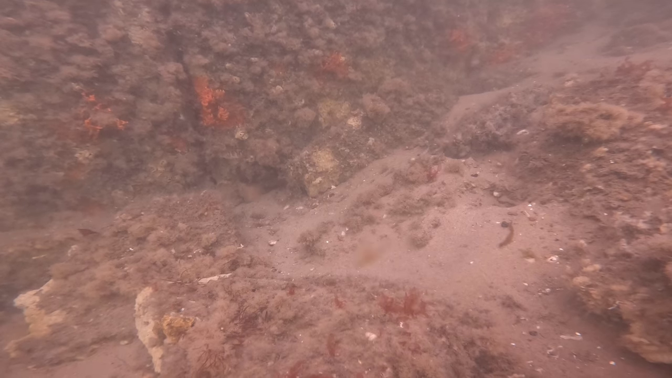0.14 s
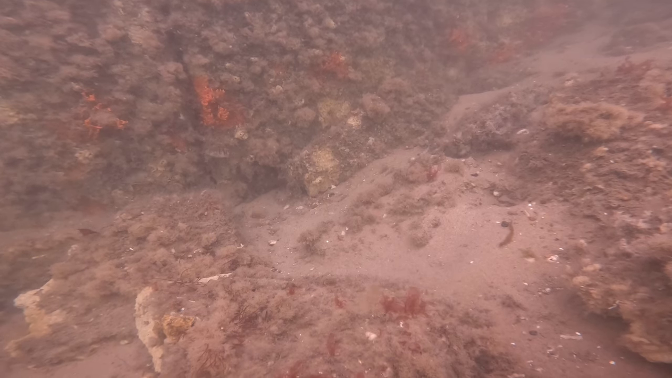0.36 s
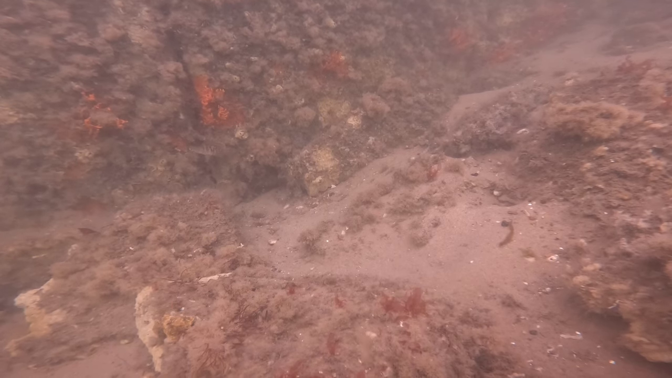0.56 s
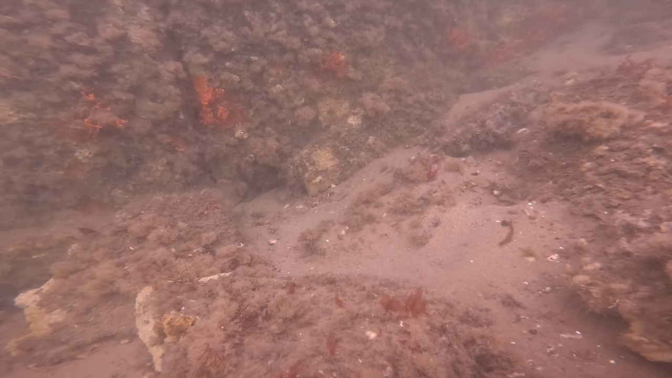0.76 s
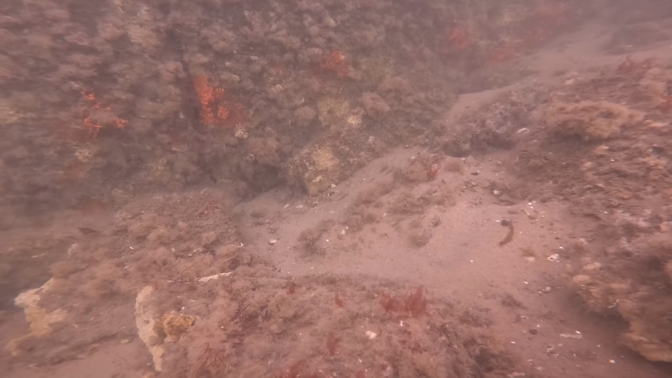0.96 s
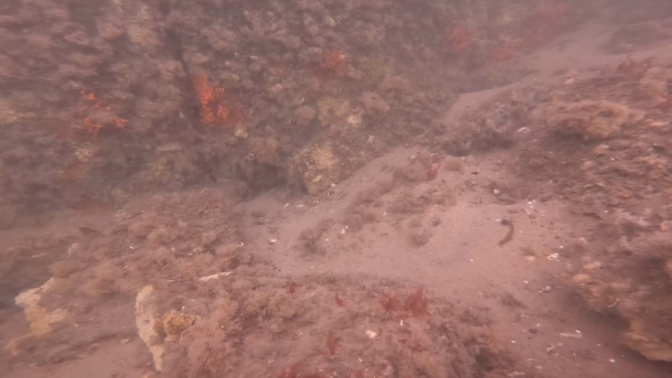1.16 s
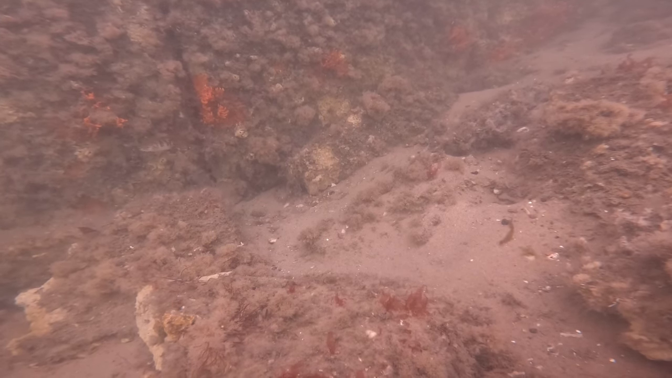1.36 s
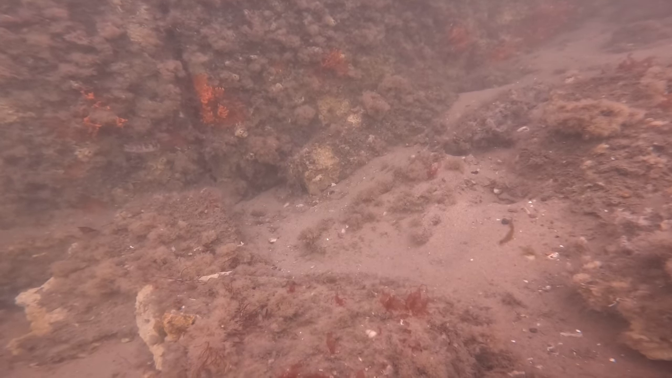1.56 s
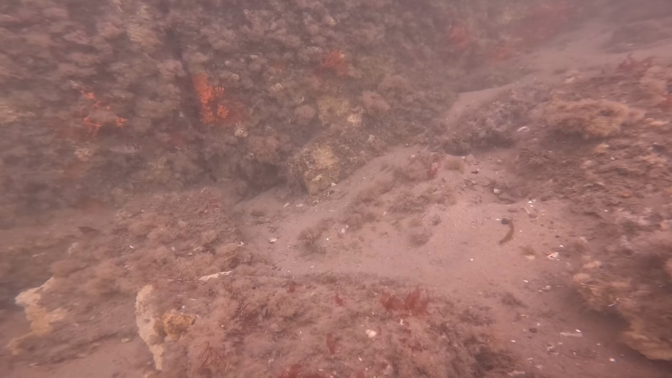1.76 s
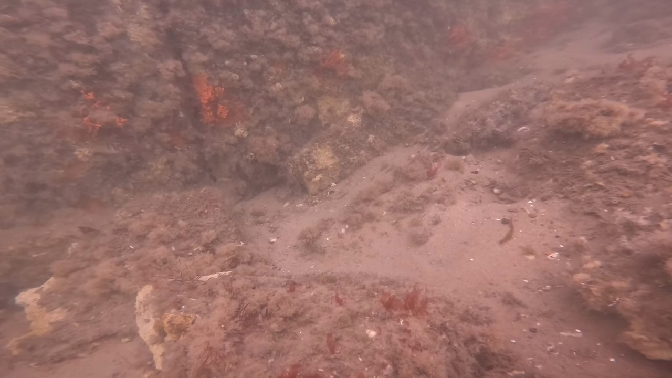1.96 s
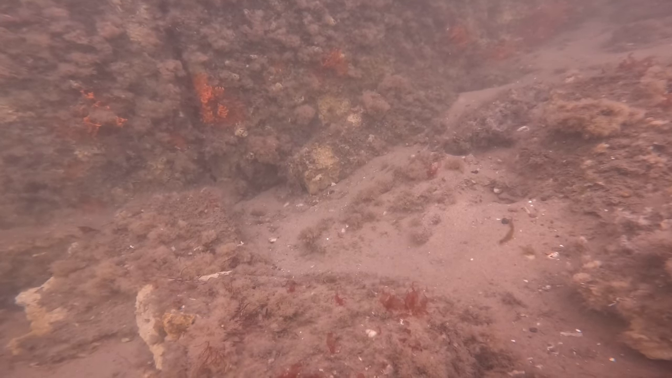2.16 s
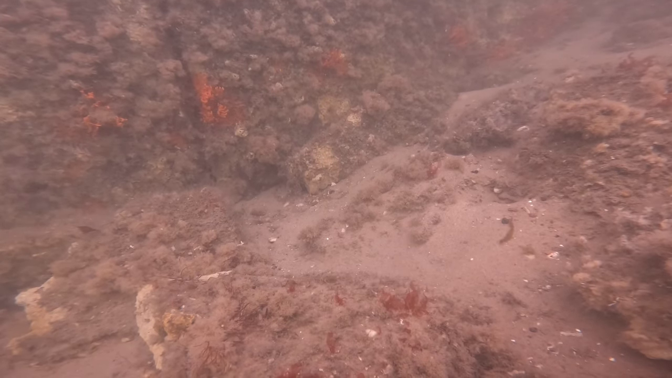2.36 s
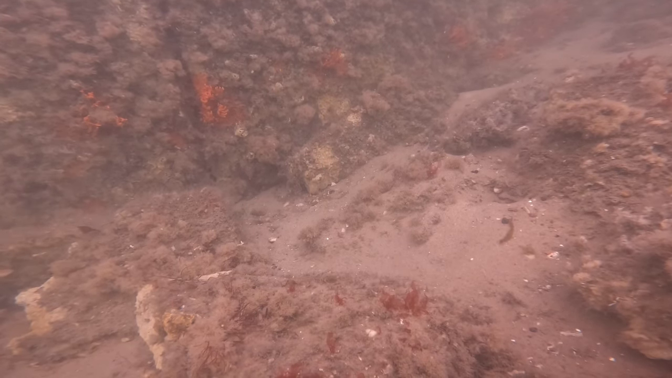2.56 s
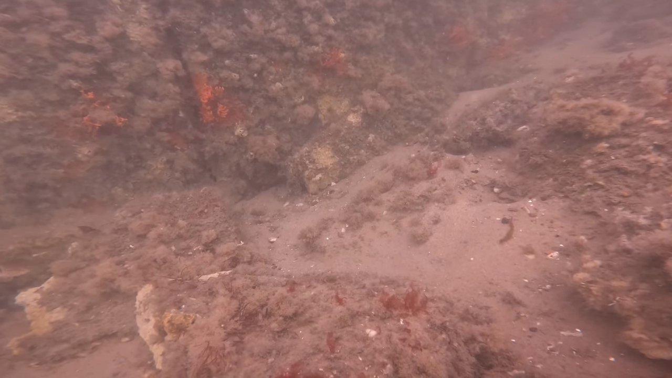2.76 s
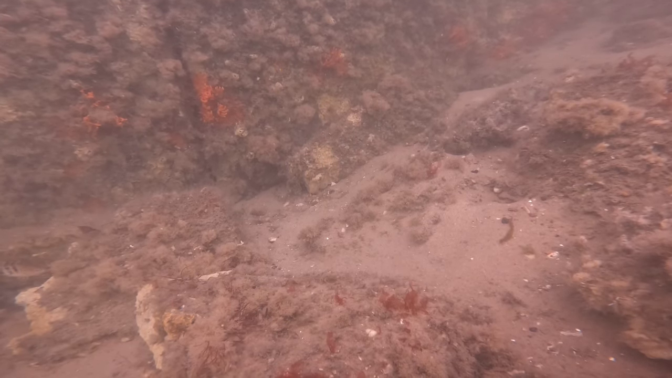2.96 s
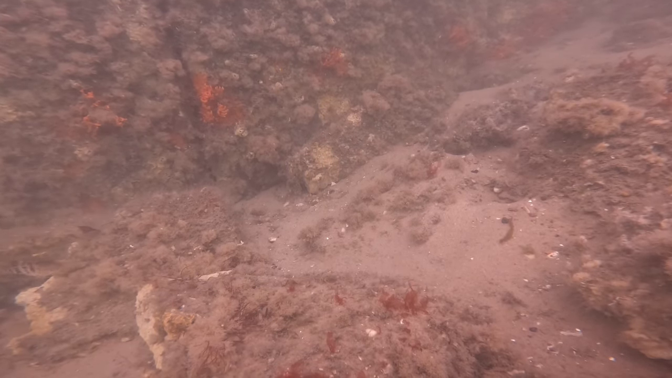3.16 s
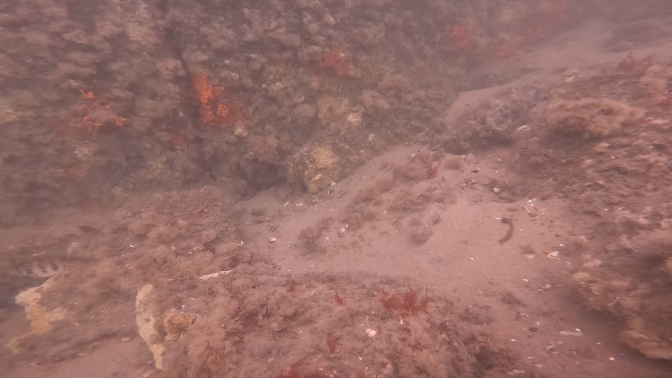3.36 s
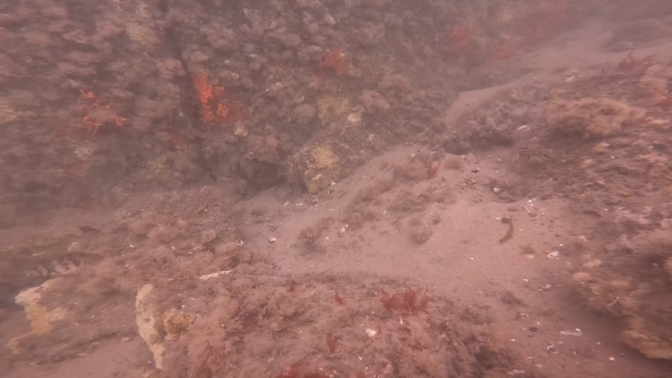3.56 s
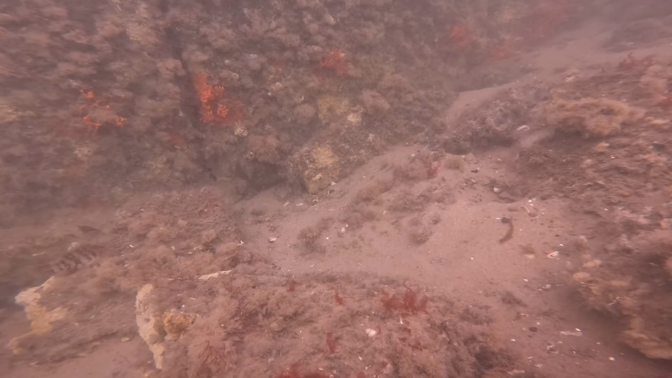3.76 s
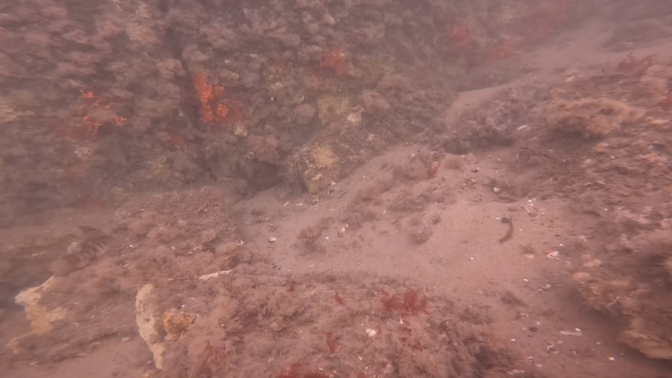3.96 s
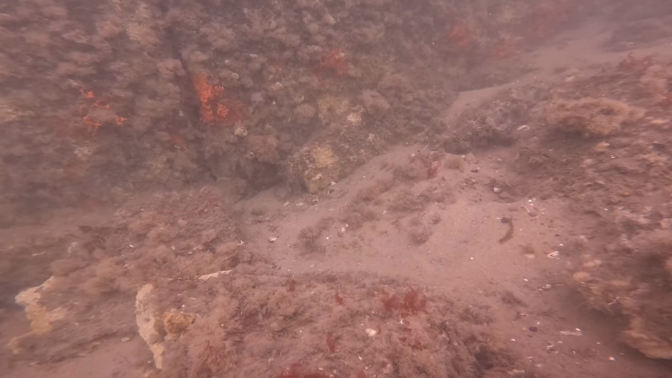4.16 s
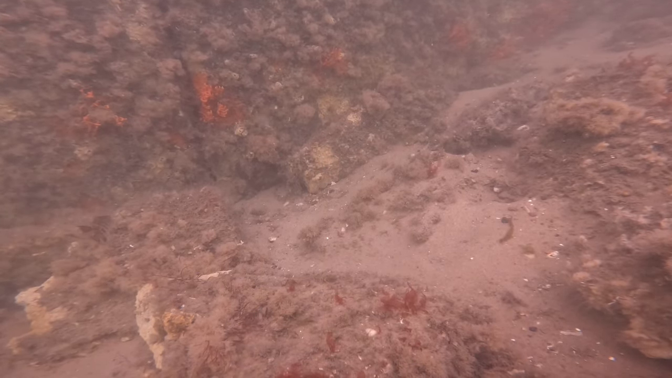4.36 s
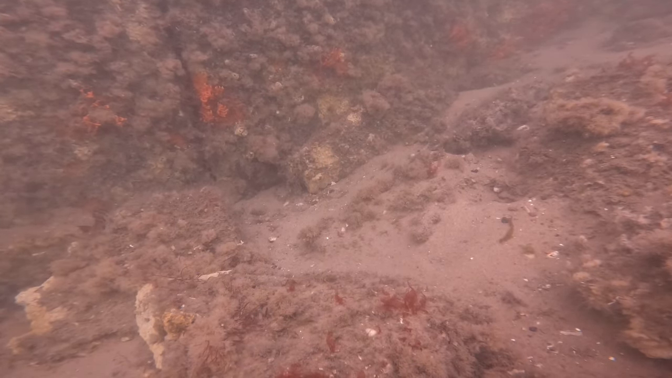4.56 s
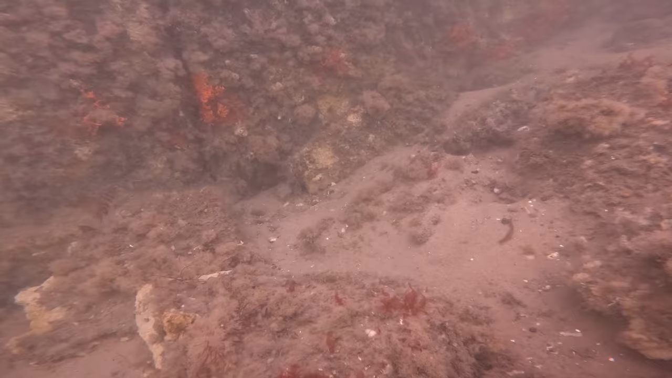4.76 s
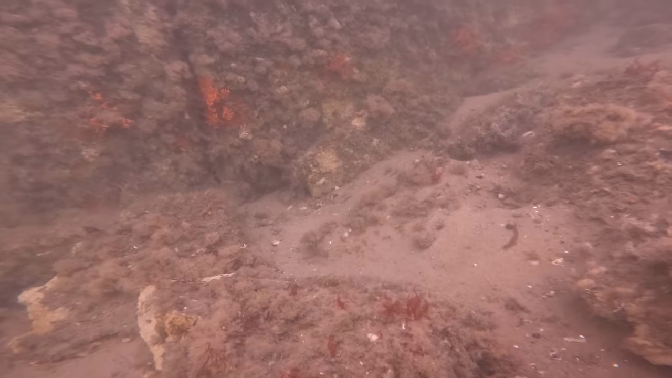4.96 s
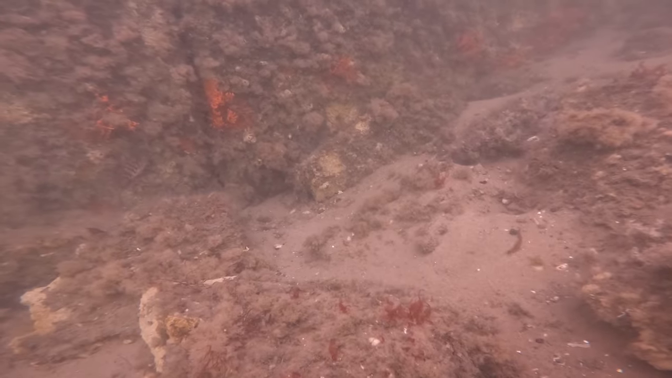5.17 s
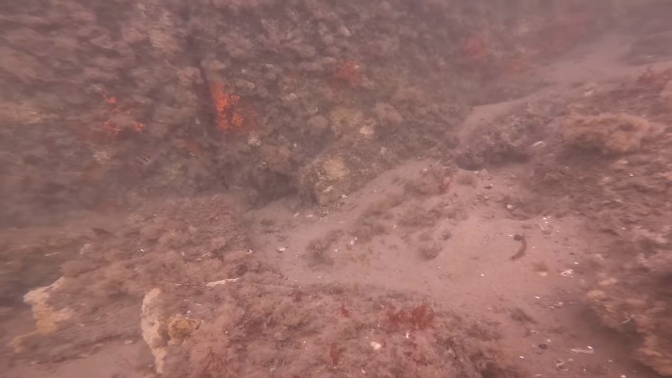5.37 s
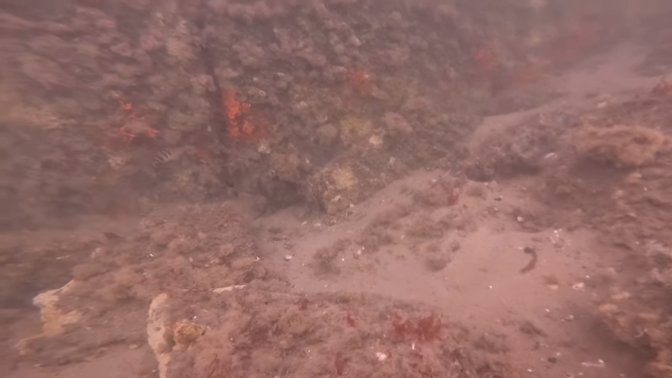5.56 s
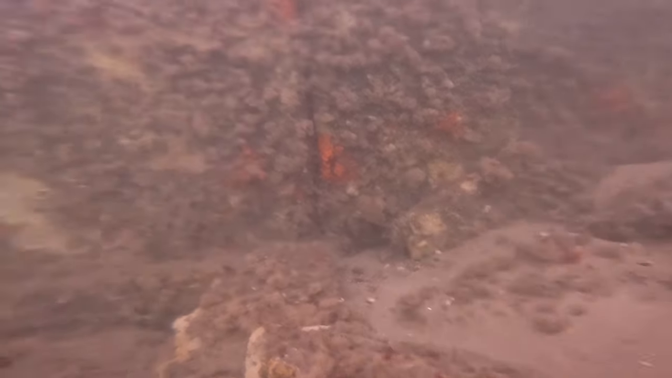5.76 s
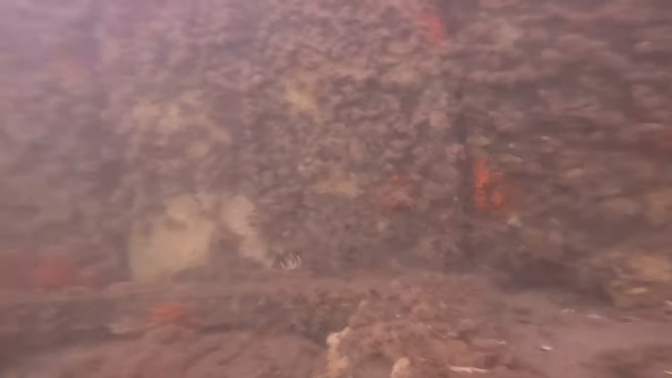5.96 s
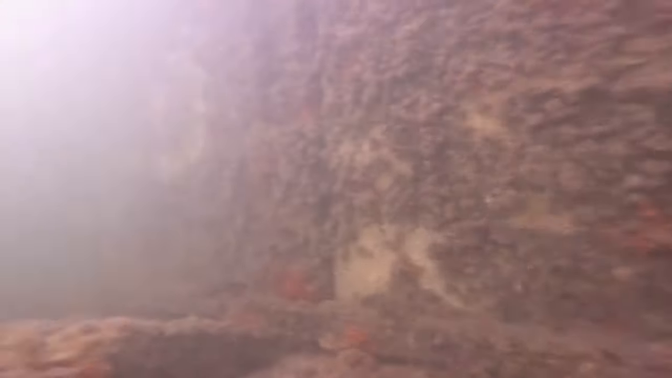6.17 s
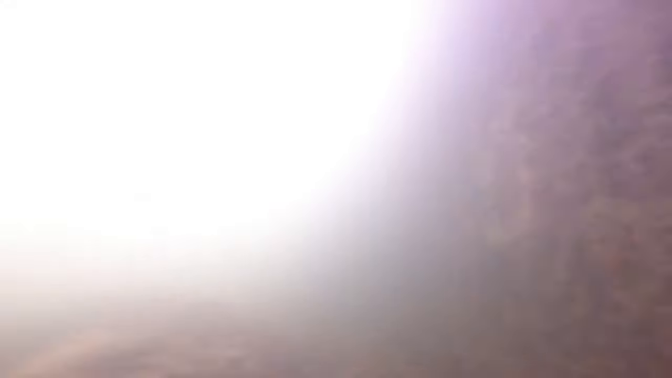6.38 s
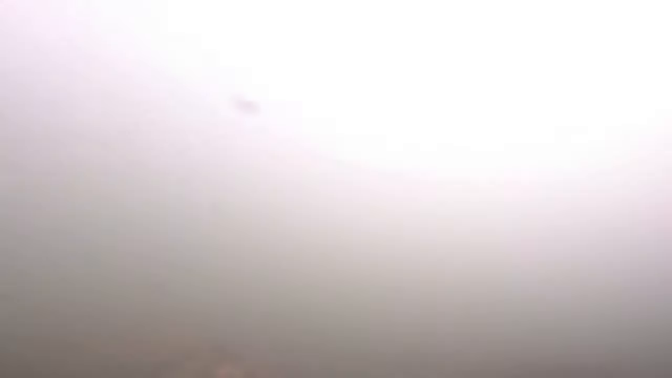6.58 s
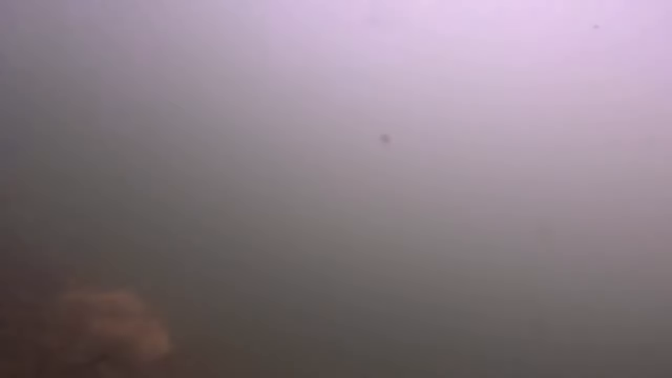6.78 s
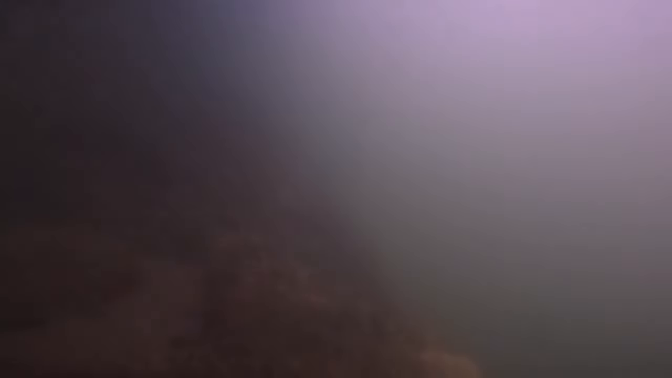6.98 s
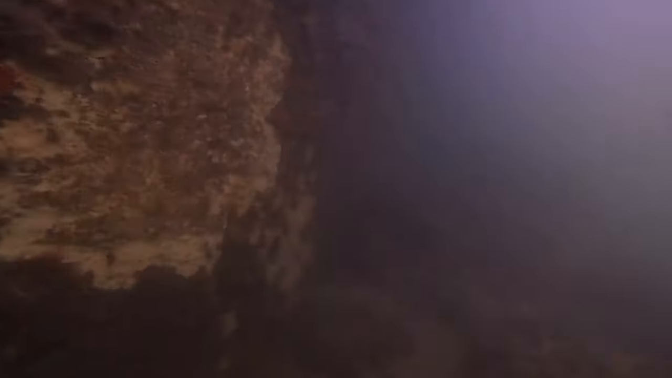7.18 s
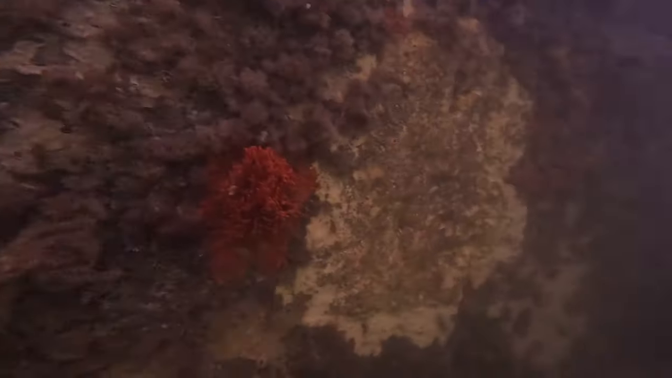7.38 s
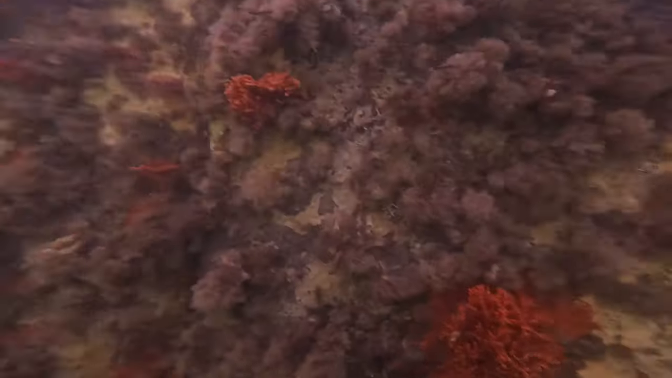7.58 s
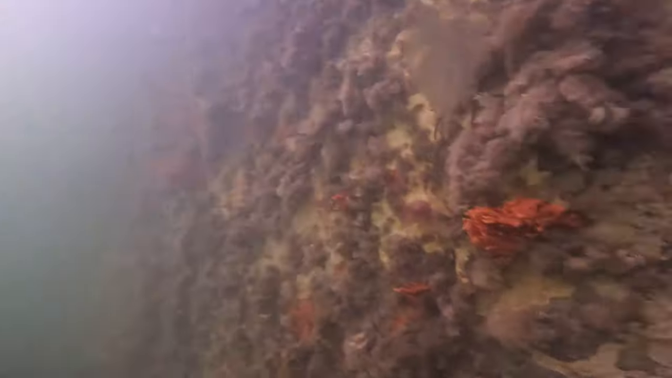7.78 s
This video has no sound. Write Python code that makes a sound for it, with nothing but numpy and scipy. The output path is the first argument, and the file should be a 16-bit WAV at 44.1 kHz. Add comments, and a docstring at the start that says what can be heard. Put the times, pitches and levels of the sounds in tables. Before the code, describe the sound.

Underwater snapping shrimp crackle and pop over a low rumble, then a submerged camera is dragged and swung with heavy muffled thuds and plastic ticks.

```python
"""Snapping shrimp crackle on a rocky reef: near snaps are a low knock, a pitched pop and a scattered crack
of noise; far ones merge into frying. Around them: rumbling swell (slow noise), murmur and hum (wavering tones).
A camera in a plastic housing is dragged off the bottom and swung round: jerks shake two mount modes over
grating noise, eddies of low noise buffet the housing, it ticks in short sine rings, and the far reef fades."""
import sys
import numpy as np
from scipy import signal
from scipy.fft import rfft, irfft, next_fast_len
from scipy.io import wavfile
from scipy.ndimage import uniform_filter1d, map_coordinates

SR = 44100
rng = np.random.default_rng(int(sys.argv[2]) if len(sys.argv) > 2 else 0)


def wrap_up_sound(samples):
    """Save the sound to the file named by the first command line argument, as 16-bit audio."""
    columns = np.atleast_2d(samples).T
    # keep every value between -1 and 1, then stretch to whole-number steps
    tamed = np.clip(columns, -1, 1)
    steps = np.round(tamed * 32767).astype(np.int16)
    wavfile.write(sys.argv[1], SR, steps)


N = 345303
TIME = np.arange(N) / SR

# Levels in all tables are taken before the gains set in scene().
# near snaps: (time [s], level [dB], treble level [dB], pop pitch [Hz], t60 [s], at least 6 ms is used)
NEAR_SNAPS = [(0.192, -44, -63, 630, 0.018), (0.328, -23.5, -45.5, 1230, 0.0098),
              (0.466, -34.5, -51, 2110, 0.07), (0.51, -32.5, -62, 660, 0.014),
              (0.575, -36, -61, 2077, 0.018), (0.613, -25.5, -51, 1674, 0.023),
              (0.691, -27.5, -52, 670, 0.011), (0.779, -32.5, -58, 500, 0.016),
              (0.809, -33, -50.5, 690, 0.02), (0.944, -22, -53, 1966, 0.015),
              (1.034, -29, -51.5, 2100, 0.027), (1.156, -32.5, -56, 580, 0.0037),
              (1.269, -40.5, -69, 1960, 0.008), (1.326, -30, -51.5, 865, 0.019),
              (1.432, -22.5, -52.5, 1990, 0.027), (1.535, -29.5, -58, 1910, 0.012),
              (1.577, -33, -56, 506, 0.014), (1.616, -37, -58, 1770, 0.027),
              (1.703, -32.5, -54, 1040, 0.013), (1.734, -24, -52, 602, 0.015),
              (1.824, -38.5, -65, 730, 0.014), (2.079, -30, -51.5, 700, 0.023),
              (2.132, -32, -57, 1630, 0.035), (2.168, -36, -60, 1680, 0.023),
              (2.226, -31, -64, 1620, 0.022), (2.248, -37, -62, 2060, 0.04), (2.574, -39, -57, 624, 0.011),
              (2.668, -36, -55, 1900, 0.0093), (2.786, -35.5, -55.5, 1120, 0.036),
              (2.92, -30.5, -49, 820, 0.033), (2.947, -23.5, -50, 1610, 0.022),
              (2.962, -27, -49, 1830, 0.024), (2.98, -28.5, -52.5, 1070, 0.049),
              (3.158, -36.5, -60, 650, 0.008), (3.223, -36.5, -64, 656, 0.0093),
              (3.261, -36.5, -64, 2050, 0.035), (3.287, -34, -63, 538, 0.014),
              (3.324, -20, -40, 732, 0.012), (3.463, -34.5, -59, 1900, 0.018),
              (3.519, -29.5, -54, 640, 0.005), (3.795, -19, -42.5, 1970, 0.014),
              (3.916, -26, -50, 1640, 0.0048), (4.113, -33.5, -61, 1250, 0.025),
              (4.171, -36.5, -56, 1730, 0.025), (4.194, -33, -54, 1150, 0.025),
              (4.204, -22, -44.5, 1350, 0.021), (4.378, -35, -55.5, 1860, 0.02),
              (4.44, -37.5, -59, 1230, 0.019), (4.487, -30, -55, 1990, 0.0097),
              (4.513, -33.5, -61, 1160, 0.017), (4.599, -26.5, -57.5, 530, 0.014),
              (4.653, -37.5, -64, 510, 0.017), (4.754, -26.5, -59, 1990, 0.011),
              (4.86, -26, -52.5, 690, 0.011), (4.901, -35.5, -65, 1590, 0.014),
              (4.965, -39.5, -66, 1200, 0.02), (5.043, -33.5, -68, 721, 0.0097),
              (5.081, -30.5, -57, 1940, 0.021), (5.144, -18, -37, 726, 0.011),
              (5.243, -34, -56, 1980, 0.046), (5.288, -29.5, -54, 767, 0.013),
              (5.474, -34, -62, 559, 0.0067), (5.512, -31.5, -53.5, 1870, 0.013),
              (5.62, -33, -61, 680, 0.036), (6.093, -23, -49, 2094, 0.0097),
              (6.283, -34.5, -50, 594, 0.0085), (7.235, -44, -91, 690, 0.019),
              (7.246, -36, -76, 830, 0.035)]
# low knocks of the closest snaps: (time [s], level [dB], final pitch [Hz], hard front level [dB])
KNOCKS = [(0.326, -22.5, 231, -34.5), (0.464, -27, 196, -39.5), (0.568, -37, 338, -58),
          (0.939, -34.5, 130, -41), (1.001, -31.5, 217, -60), (1.018, -32, 223, -44),
          (1.43, -31, 258, -33.5), (1.468, -30.5, 202, -38.5), (2.919, -28.5, 189, -40),
          (3.318, -22.5, 167, -29), (3.514, -36, 228, -46), (2.242, -34, 253, -48),
          (3.574, -36, 253, -46.5), (3.794, -23.5, 203, -32), (4.201, -33.5, 338, -37.5),
          (4.672, -29.5, 126, -56), (4.838, -23.5, 166, -58), (5.137, -22.5, 200, -37),
          (6.091, -32.5, 106, -33.5), (7.247, -39, 99.3, -33)]
# housing ticks in the hand: (time [s], level [dB], ring pitch [Hz], ring t60 [s], sharp edge level [dB])
TICKS = [(6.389, -11.5, 1290, 0.0071, -41), (6.398, -24.5, 2030, 0.054, -41), (6.419, -5, 1730, 0.008, -44),
         (6.433, -9, 1920, 0.015, -57), (6.433, -19.5, 3520, 0.015, -60), (6.565, -21.5, 2100, 0.025, -63),
         (6.603, -12, 2026, 0.021, -20.5), (6.612, -7, 3320, 0.011, -25.5),
         (6.623, -39, 3330, 0.018, -24.5), (6.634, -33, 3450, 0.023, -25), (6.761, -24, 2130, 0.018, -50.5),
         (6.823, -30, 2096, 0.021, -59.5), (6.856, -32, 2070, 0.017, -67.5),
         (7.038, -41.5, 2130, 0.032, -61.5), (7.439, -28, 1610, 0.031, -59.5),
         (7.462, -35.5, 1626, 0.04, -83), (7.633, -35, 1600, 0.035, -88), (7.744, -27.5, 1610, 0.039, -51)]
# thin bright clicks, like grit touching the housing: (time [s], level [dB])
GRIT_CLICKS = [(0.615, -45), (0.811, -38), (1.181, -47), (1.27, -48.5), (2.136, -43), (4.4, -49),
               (4.757, -42), (5.979, -47), (6.025, -43.5), (6.133, -46)]
# shoves of the swinging camera:
# (start [s], length [s], pressure push level [dB], buffeting level [dB], small eddy level [dB])
SHOVES = [(6.335, 0.062, -16, -17, -25.5), (6.39, 0.15, -21.5, -19, -24), (6.48, 0.098, -21, -17, -22.5),
          (6.6, 0.031, -25, -19, -25.5), (6.68, 0.11, -27, -22, -28.5), (6.83, 0.047, -19.5, -19.5, -36),
          (6.96, 0.079, -27, -29.5, -54.5), (7.035, 0.0094, -23, -28, -49.5),
          (7.375, 0.046, -53, -30.5, -53), (7.49, 0.2, -51, -26, -42.5), (7.65, 0.08, -44.5, -21.5, -39),
          (7.725, 0.035, -27, -17.5, -38)]
# jerks of the dragged camera: (start [s], length [s], lower mode level [dB], upper mode level [dB])
DRAGS = [(5.655, 0.04, -29, -35), (5.695, 0.24, -23, -26), (5.8, 0.075, -17, -20),
         (5.91, 0.018, -35, -17.5), (5.98, 0.059, -24.5, -18), (6.09, 0.26, -38.5, -39.5),
         (7.385, 0.025, -31, -30), (7.545, 0.07, -45.5, -22.5)]
# hand rubbing along the housing: (start [s], length [s], level [dB])
RUBS = [(6.38, 0.068, -31), (6.46, 0.21, -47.5), (6.73, 0.051, -39), (6.8, 0.092, -48.5)]
# water washing along the housing as it nears the rock wall: (start [s], length [s], level [dB])
WASHES = [(6.95, 0.59, -55.5), (7.5, 0.22, -48.5), (7.62, 0.17, -42.5)]
# thin hiss: (start [s], length [s], level [dB])
FIZZES = [(6.365, 0.09, -67), (6.46, 0.15, -79)]
# low murmur of the sea: (time [s], level [dB])
MURMUR_LEVEL = [(0, -50.5), (2, -50.5), (4.5, -46.5), (7.3, -51)]
# hum of the mount in the current: (pitch [Hz], level [dB], swell time [s], swell width [s], swell [dB])
HUM_TONES = [(57.5, -50, 2.8, 0.37, 3), (82.1, -55.5, 2.8, 0.74, 6), (113.7, -55, 2.3, 0.94, 4.5)]
# camera on its mount, low modes: (pitch [Hz], width [Hz], doubled in each of two cascaded stages)
MOUNT_MODES = [(57, 8.4), (119, 12.4)]
# housing modes: (pitch [Hz], width [Hz], gain at resonance [dB])
HOUSING_MODES = [(177.6, 6.9, -6.5), (371, 16, -10), (471, 47, -10)]

# Relative power spectra, scaled to unit power in use.
# far crackle: (frequency [Hz], density [dB])
CRACKLE_COLOUR = [(100, -4), (200, 12.5), (430, -1.5), (600, -7), (760, -2), (900, -12), (1130, -7),
                  (1500, -10.5), (1850, -0.5), (2130, -0.5), (2380, -26.5), (2700, -27), (3250, -12),
                  (4200, -37.5)]
# body of a near crack: (frequency [Hz], density [dB])
CRACK_COLOUR = [(150, -23.5), (350, 7), (750, 3.5), (920, -2.5), (1250, 2.5), (1550, -2.5), (1900, 4.5),
                (2120, 1), (2350, -10.5), (2700, -23), (3300, -7.5), (4100, -23), (5000, -36.5)]
# treble of snaps, grit and hiss: (frequency [Hz], density [dB])
TREBLE_COLOUR = [(3000, -5), (4400, -10.5), (5300, -1), (6000, 6), (6600, -2.5), (7300, 0.5), (8100, -11),
                 (9600, -10), (10500, -21.5), (11500, -54)]
# scatter around a knock: (frequency [Hz], density [dB])
KNOCK_COLOUR = [(110, 1.5), (250, 3), (550, -9), (800, -6)]
# swell pressure: (frequency [Hz], density [dB])
SWELL_COLOUR = [(4, -10), (12, 9), (20, 8.5), (30, -9), (50, -18.5), (90, -23), (200, -46.5)]
# sea murmur: (frequency [Hz], density [dB])
MURMUR_COLOUR = [(30, -16.5), (57, -8.5), (80, -3.5), (98, -14), (116, 1), (140, -6.5), (200, -12.5),
                 (400, -41.5), (900, -66)]
# large eddies: (frequency [Hz], density [dB])
BUFFET_COLOUR = [(20, -25.5), (35, -4), (55, -1), (80, 0), (120, -4.5), (150, -10), (200, -14), (300, -55),
                 (700, -65)]
# small eddies: (frequency [Hz], density [dB])
EDDY_COLOUR = [(100, -24), (180, 13), (250, 2.5), (400, 0.5), (600, -9), (760, -10), (1100, -20),
               (1600, -25.5), (2130, -28), (2600, -47), (3350, -38.5), (4300, -52), (6000, -51.5),
               (15000, -84)]
# sharp edge of a tick: (frequency [Hz], density [dB])
EDGE_COLOUR = [(800, 12.5), (2000, -3.5), (3300, 11), (4300, -5.5), (5400, 9), (7000, -3.5), (9300, -11.5),
               (10500, -43)]
# grating on the bottom: (frequency [Hz], density [dB])
GRIT_COLOUR = [(130, 11), (230, 4.5), (380, -2.5), (470, 4), (560, -6), (1000, -12), (2100, -21.5),
               (2650, -29.5), (3300, -17.5), (4100, -32.5), (5000, -25.5), (7000, -48.5), (10000, -62.5)]
# water along the housing: (frequency [Hz], density [dB])
WASH_COLOUR = [(300, -18), (520, 5.5), (830, 0), (1100, -13), (1600, -24.5), (2400, -41), (6000, -49)]
# thin hiss: (frequency [Hz], density [dB])
FIZZ_COLOUR = [(7000, -1), (11000, 0.5), (15500, -4)]

# weaker snaps by chance: means, and half range of the level (treble: twice that)
WEAK_PER_S, WEAK_DB, WEAK_TREBLE_DB, WEAK_SPREAD_DB, WEAK_T60_S = 4, -44, -73, 4.5, 0.0079
# the brighter a snap, the more the rocks echo it: usual treble re body, dB of echo per dB of extra treble
USUAL_TREBLE_DB, ECHO_DB_PER_DB = -25, 0.55
# distant colony: reference levels, and its fade as the camera swings away
CRACKLE_REF_DB, BRIGHT_REF_DB = -55, -68
FADE_START_S, FADE_S, FADE_DB = 6.6, 0.25, 16.5
# swell at rest; it fades with the reef by a share of its dB
SWELL_DB, SWELL_FADE_SHARE = -34.5, 0.51
SHOVE_ATTACK_S, SHOVE_T60_S, PUSH_LEAD_S = 0.016, 0.32, 0.048
EDDY_ATTACK_S, EDDY_T60_S = 0.035, 0.32
# flow that goes on between the shoves
WAKE_BUFFET_DB, WAKE_EDDY_DB = -41.5, -51
DRAG_ATTACK_S, DRAG_T60_S = 0.018, 0.39
RUB_ATTACK_S, RUB_T60_S = 0.015, 0.14
WASH_ATTACK_S, WASH_T60_S = 0.049, 0.36
FIZZ_ATTACK_S, FIZZ_T60_S = 0.008, 0.04
# the swing ends in a lurch
LURCH_S, LURCH_DB, LURCH_HZ = 7.745, -15.5, 25.8
HUM_WANDER_HZ, HUM_WAVER_DB = 1.19, 3.5
CUTOFF_HZ, END_FADE_S = 15700, 0.012


def from_db(db):
    """Amplitude of a level."""
    return 10 ** (np.asarray(db) / 20)


def rms_one(x):
    """Scale to rms 1."""
    return x / np.sqrt(np.mean(x ** 2) + 1e-20)


def add(track, s, sound):
    """Mix a sound in at a time."""
    start = max(int(s * SR), 0)
    track[start:start + len(sound)] += sound[:N - start]


def coloured(x, points):
    """Causal (minimum-phase) filter with the given spectrum; white noise keeps its power."""
    size = 2 * next_fast_len(N // 2 + SR // 2)
    hz, db = np.transpose(points)
    bins_hz = np.maximum(np.fft.rfftfreq(size, 1 / SR), 1)
    octaves_beyond = np.abs(np.log2(bins_hz / np.clip(bins_hz, hz[0], hz[-1])))
    gain_db = np.interp(np.log(bins_hz), np.log(hz), db) - 18 * octaves_beyond
    # folding the cepstrum gives minimum phase
    cepstrum = irfft(np.log(rms_one(from_db(gain_db))))
    cepstrum[1:size // 2] *= 2
    cepstrum[size // 2 + 1:] = 0
    return irfft(rfft(x, size) * np.exp(rfft(cepstrum)))[:N]


def noise(points):
    """Noise of a given colour, rms 1."""
    return rms_one(coloured(rng.standard_normal(N), points))


def steady(x, span_s):
    """Even out the slow chance swings of a noise."""
    return x / np.sqrt(uniform_filter1d(x ** 2, max(int(span_s * SR), 2)) + 1e-9)


def drift(per_s):
    """Slow random swing; spread about 1."""
    knots = rng.standard_normal(4000)
    return map_coordinates(knots, [TIME * per_s], order=2, mode="mirror")


def ring(x, hz, width_hz):
    """Two-pole resonance; a unit click starts a decaying sine of initial height 1."""
    r, w = np.exp(-np.pi * width_hz / SR), 2 * np.pi * hz / SR
    return signal.lfilter([0, np.sin(w)], [1, -2 * r * np.cos(w), r * r], x + 1e-18)


def wavelet(t, hz, swell_cycles, chirp, chirp_s):
    """A few cycles that swell, fade and fall in pitch (unless chirp is 0); envelope height 1."""
    cycles = hz * (t + chirp * chirp_s * (1 - np.exp(-t / chirp_s)))
    age = t * hz / swell_cycles
    return (age * np.exp(1 - age)) ** 3.44 * np.sin(2 * np.pi * cycles)


def scatter(t, t60, rise_s, tail_db, tail_t60):
    """Envelope of a snap: a quick cluster of arrivals, then the echo from the rocks."""
    decay = np.hypot(from_db(-60 * t / t60), from_db(tail_db - 60 * t / tail_t60))
    return (1 - np.exp(-t / rise_s)) ** 2 * decay


def strokes(rows, attack_s, t60, lead_s=0):
    """Gain for each level column of (start, length, dB, ..): every stroke rises, holds and dies away."""
    power = 0
    for start_s, length_s, *levels_db in rows:
        t = TIME - start_s + lead_s
        shape = np.clip(t / attack_s, 0, 1) * from_db(-60 * np.clip((t - length_s) / t60, 0, 2))
        power = power + np.outer(from_db(levels_db), shape) ** 2
    return np.sqrt(power)


def chance_sizes(per_s, spread_db):
    """Sparse random impulses of uneven strength."""
    sizes = from_db(spread_db * np.minimum(rng.exponential(1, N), 2.5))
    return sizes * (rng.random(N) < per_s / SR)


def activity(per_s, spread_db, wash_power):
    """Loudness of a stream of uneven small events over an even wash."""
    sizes = chance_sizes(per_s, spread_db)
    shape = scatter(TIME[:SR // 10], t60=0.011, rise_s=0.0009, tail_db=-17.0, tail_t60=0.13)
    power = np.abs(signal.fftconvolve(sizes ** 2, shape ** 2)[:N])
    return np.sqrt(power / power.mean() + wash_power)


def reef_fade_db():
    """Change in level of the far reef as the camera swings away from it."""
    return -FADE_DB * np.clip((TIME - FADE_START_S) / FADE_S, 0, 1)


def hum():
    """Three low tones that waver in pitch and level; each swells once in its own time."""
    out = 0
    for hz, db, swell_s, width_s, swell_db in HUM_TONES:
        swell = np.exp(-((TIME - swell_s) / width_s) ** 2)
        level_db = db + HUM_WAVER_DB * drift(per_s=6.5) + swell_db * swell
        cycles = np.cumsum(hz + HUM_WANDER_HZ * drift(per_s=7.0)) / SR
        out = out + from_db(level_db) * np.sin(2 * np.pi * cycles)
    return np.sqrt(2) * out


def sea():
    """Swell presses slowly over a low murmur; pressure runs ahead of each shove; a lurch is one slow wave."""
    push, _, _ = strokes(SHOVES, SHOVE_ATTACK_S, SHOVE_T60_S, PUSH_LEAD_S)
    press = np.hypot(from_db(SWELL_DB + SWELL_FADE_SHARE * reef_fade_db()), push)
    swell = press * steady(noise(SWELL_COLOUR), span_s=0.21)
    murmur_gain = from_db(np.interp(TIME, *np.transpose(MURMUR_LEVEL)))
    murmur = murmur_gain * steady(noise(MURMUR_COLOUR), span_s=0.083)
    t = np.maximum(TIME - LURCH_S, 0)
    lurch = from_db(LURCH_DB) * wavelet(t, LURCH_HZ, swell_cycles=0.8, chirp=0, chirp_s=0.01)
    return lurch + swell + murmur


def colony(per_s, spread_db, body_db, treble_db):
    """Countless far snaps merge into a frying crackle; their treble blurs into a smoother hiss."""
    dull = activity(per_s, spread_db, wash_power=0.3) * noise(CRACKLE_COLOUR)
    bright = activity(per_s, spread_db, wash_power=1.2) * noise(TREBLE_COLOUR)
    mix = from_db(CRACKLE_REF_DB + body_db) * dull + from_db(BRIGHT_REF_DB + treble_db) * bright
    return from_db(reef_fade_db()) * mix


def far_pops(per_s, level_db, spread_db, width_share, smear_t60, bunching_db):
    """Snaps at middle distance bunch up, each smeared and coloured by its way between the rocks."""
    bunches = rms_one(from_db(bunching_db * drift(per_s=22)))
    sizes = chance_sizes(per_s * bunches, spread_db)
    t = TIME[:SR // 20]
    dealt = rng.integers(0, 16, N)  # pitch band of each snap
    smear = t * from_db(-60 * t / smear_t60)
    pops = 0
    for k, hz in enumerate(np.geomspace(400, 2100, 16)):
        path = smear * rng.standard_normal(len(t))
        smeared = signal.oaconvolve(sizes * (dealt == k), path)[:N]
        pops = pops + np.sqrt(hz) * ring(smeared, hz, width_share * hz)
    gain = from_db(CRACKLE_REF_DB + reef_fade_db() + level_db)
    return gain * rms_one(coloured(pops, CRACKLE_COLOUR))


def wash(uneven_db):
    """Uneven, hollow rush of water."""
    level, = strokes(WASHES, WASH_ATTACK_S, WASH_T60_S)
    return level * from_db(uneven_db * drift(per_s=26)) * noise(WASH_COLOUR)


def fizz():
    """Thin, even hiss in short strokes that stop short."""
    level, = strokes(FIZZES, FIZZ_ATTACK_S, FIZZ_T60_S)
    return level * noise(FIZZ_COLOUR)


def flow(buffet_db, eddy_db, lumpiness, burst_db, gurgle_db, gurgles_per_s, gurgle_width_hz):
    """Large eddies buffet the swinging housing and shed small ones with each shove; water pockets gurgle."""
    _, buffeting, _ = strokes(SHOVES, SHOVE_ATTACK_S, SHOVE_T60_S)
    _, _, shedding = strokes(SHOVES, EDDY_ATTACK_S, EDDY_T60_S)
    moving = np.clip((TIME - SHOVES[0][0]) / SHOVE_ATTACK_S, 0, 1)
    large = steady(noise(BUFFET_COLOUR), span_s=0.063)
    small = steady(noise(EDDY_COLOUR) * np.exp(lumpiness * large), span_s=0.035)
    pockets = 0
    for hz in np.geomspace(175, 520, 8):
        kicks = rng.standard_normal(N) * (rng.random(N) < gurgles_per_s / 8 / SR)
        pockets = pockets + ring(kicks, hz, gurgle_width_hz) / hz
    gurgle = from_db(gurgle_db) * steady(rms_one(pockets), span_s=0.16)
    bursts = steady(from_db(burst_db * drift(per_s=74)), span_s=0.17)
    large_gain = np.hypot(from_db(buffet_db) * buffeting, from_db(WAKE_BUFFET_DB) * moving)
    small_gain = np.hypot(from_db(eddy_db) * shedding, from_db(WAKE_EDDY_DB) * moving)
    return large_gain * large + small_gain * bursts * (small + gurgle)


def drag(shudder_db, grit_db, sand_db, hiss_db):
    """Rubbing over the bottom shakes the mount in its two low modes while sand grates and hisses under it."""
    levels = strokes(DRAGS, DRAG_ATTACK_S, DRAG_T60_S)
    shudder = 0
    for level, (hz, width_hz) in zip(levels, MOUNT_MODES):
        mode = ring(ring(rng.standard_normal(N), hz, 2 * width_hz), hz, 2 * width_hz)
        shudder = shudder + level * steady(rms_one(mode), span_s=0.029)
    force = np.hypot(*levels) * from_db(reef_fade_db())  # grating fades as the camera leaves the bottom
    sand = from_db(sand_db) * noise(CRACKLE_COLOUR) + from_db(hiss_db) * noise(TREBLE_COLOUR)
    grains = activity(per_s=59, spread_db=5.5, wash_power=0.13)
    grating = from_db(grit_db) * noise(GRIT_COLOUR)
    return from_db(shudder_db) * shudder + force * (grating + grains * sand)


def rub(level_db, slips_per_s, hz, width_hz, hiss_db):
    """Small slips of the hand keep the wall of the housing ringing roughly, with a faint hiss."""
    press, = strokes(RUBS, RUB_ATTACK_S, RUB_T60_S)
    slips = rng.standard_normal(N) * (rng.random(N) < slips_per_s / SR)
    wall = steady(rms_one(ring(ring(slips, hz, width_hz), hz, width_hz)), span_s=0.039)
    return press * (from_db(level_db) * wall + from_db(hiss_db) * noise(TREBLE_COLOUR))


def grit_clicks(level_db, t60):
    """Dry bursts of bright noise with no echo."""
    out, t = np.zeros(N), TIME[:SR // 20]
    for s, db in GRIT_CLICKS:
        add(out, s, from_db(db + level_db - 60 * t / t60) * rng.standard_normal(len(t)))
    return coloured(out, TREBLE_COLOUR)


def ticks(edge_t60):
    """The plastic slips with a sharp noise edge and rings briefly as a decaying sine."""
    rings, edges, t = np.zeros(N), np.zeros(N), TIME[:SR // 10]
    for s, db, hz, t60, edge_db in TICKS:
        envelope = from_db(db - 60 * t / t60) * (1 - np.exp(-t / 0.0014))
        add(rings, s, envelope * np.sin(2 * np.pi * hz * t))
        add(edges, s, from_db(edge_db - 60 * t / edge_t60) * rng.standard_normal(len(t)))
    return rings + coloured(edges, EDGE_COLOUR)


def housing_ring(blows):
    """Low modes of the housing, set ringing by knocks and cracks."""
    out = 0
    for hz, width_hz, db in HOUSING_MODES:
        out = out + from_db(db) * 2 * np.pi * width_hz / SR * ring(blows, hz, width_hz)
    return out


def knocks(level_db, front_db, front_hz, echo_s, echo_db, rough_db, rough_t60):
    """Shallow water delays the lows: a hard front runs ahead of the deep part, echoes once and scatters."""
    out, rough, t = np.zeros(N), np.zeros(N), TIME[:SR // 12]
    for s, db, hz, hard_db in KNOCKS:
        pitch_hz = front_hz * np.exp(rng.normal(0, 0.15))
        front = wavelet(t, pitch_hz, swell_cycles=1.0, chirp=1.86, chirp_s=0.0008)
        front = from_db(hard_db + front_db) * front
        deep = wavelet(t, hz, swell_cycles=1.0, chirp=1.0, chirp_s=0.0015)
        spread = scatter(t, rough_t60, rise_s=0.00094, tail_db=-31.5, tail_t60=0.092)
        add(out, s + 0.0021, from_db(db + level_db) * deep)
        add(out, s + 0.001, front)
        add(out, s + echo_s * rng.uniform(0.92, 1.1), from_db(echo_db) * front)
        add(rough, s, from_db(db + rough_db) * rng.standard_normal(len(t)) * spread)
    return out + coloured(rough, KNOCK_COLOUR)


def weak_snaps():
    """Rows like those of the near snaps, one at a random moment in each slot until the reef fades."""
    rows = []
    for k in range(int(FADE_START_S * WEAK_PER_S)):
        when, size, bright, pitch = rng.random(4)
        db = WEAK_DB + WEAK_SPREAD_DB * (2 * size - 1)
        treble_db = WEAK_TREBLE_DB + 2 * WEAK_SPREAD_DB * (2 * bright - 1)
        rows.append(((k + when) / WEAK_PER_S, db, treble_db, 900 * 2.3 ** pitch, WEAK_T60_S))
    return rows


def near_snaps(body_db, treble_db, pop_db, pop_s, treble_lag_s, bounce_db, bounce_s):
    """Each collapsing cavity pops at its own pitch and arrives by many paths; the low part leads."""
    body, top, pops, t = np.zeros(N), np.zeros(N), np.zeros(N), TIME[:SR // 4]
    for s, db, bright_db, hz, t60 in [*NEAR_SNAPS, *weak_snaps()]:
        paths = rng.standard_normal((3, len(t)))
        t60 = max(t60, 0.006)
        pop = t / pop_s * np.exp(1 - t / pop_s) * np.sin(2 * np.pi * hz * t)
        add(pops, s, from_db(db + pop_db) * pop)
        echo_db = -16.0 + ECHO_DB_PER_DB * (bright_db - db - USUAL_TREBLE_DB)
        low = scatter(t, t60, rise_s=0.0011, tail_db=echo_db, tail_t60=0.21)
        high = scatter(t, t60, rise_s=0.00022, tail_db=-13.0, tail_t60=0.21)
        add(body, s - 0.0005, from_db(db) * paths[0] * low)
        add(top, s + treble_lag_s, from_db(bright_db) * paths[1] * high)
        # second group of arrivals, off the nearest rock face
        bounce = from_db(db + bounce_db - 60 * t / t60) * paths[2]
        add(body, s + bounce_s * rng.uniform(0.538, 1.2), bounce)
    crack = from_db(body_db) * coloured(body, CRACK_COLOUR)
    return pops + crack + from_db(treble_db) * coloured(top, TREBLE_COLOUR)


def scene():
    """Water, housing and shrimp at one microphone."""
    water = sea() + hum() + wash(uneven_db=3.5) + fizz()
    water += flow(buffet_db=-1, eddy_db=1.0, lumpiness=0.28, burst_db=2.1,
                  gurgle_db=-1.5, gurgles_per_s=240, gurgle_width_hz=40)
    reef = colony(per_s=77, spread_db=6.5, body_db=1.0, treble_db=-6.0)
    reef += far_pops(per_s=110, level_db=3.5, spread_db=4.0, width_share=0.23,
                     smear_t60=0.023, bunching_db=3.5)
    housing = drag(shudder_db=-1.7, grit_db=-19.0, sand_db=-24, hiss_db=-47.5)
    housing += rub(level_db=-9.5, slips_per_s=170, hz=2130, width_hz=58, hiss_db=-35.5)
    housing += grit_clicks(level_db=1.0, t60=0.0079) + ticks(edge_t60=0.011)
    snaps = knocks(level_db=6.5, front_db=11.5, front_hz=386, echo_s=0.006, echo_db=-4.0,
                   rough_db=-3.5, rough_t60=0.022)
    snaps += near_snaps(body_db=1.0, treble_db=4.0, pop_db=-8.0, pop_s=0.0026,
                        treble_lag_s=0.0028, bounce_db=-8.5, bounce_s=0.004)
    return (water + reef + housing + housing_ring(snaps) + snaps)[None]


def record(dry):
    """The microphone rounds high peaks and adds a trace of hiss; the end fades and the top is cut."""
    ceiling = 0.54
    rounded = dry / (1 + (dry / ceiling) ** 4) ** (1 / 4)
    hiss = from_db(-99) * rng.standard_normal(dry.shape)
    end_fade = np.clip((TIME[-1] - TIME) / END_FADE_S, 0, 1)
    lowpass = signal.cheby2(12, 70, CUTOFF_HZ, fs=SR, output="sos")
    return signal.sosfilt(lowpass, (rounded + hiss) * end_fade)


dry = scene()
out = record(dry)
wrap_up_sound(out)
```